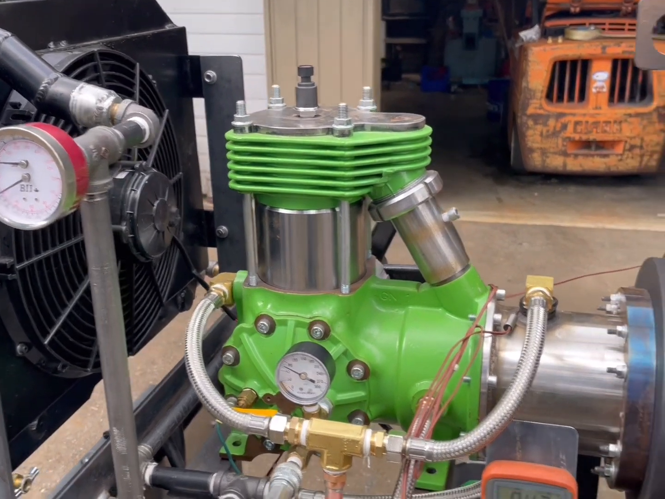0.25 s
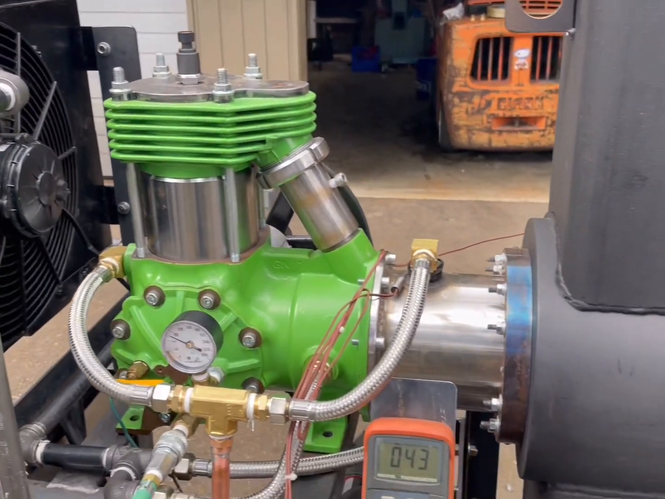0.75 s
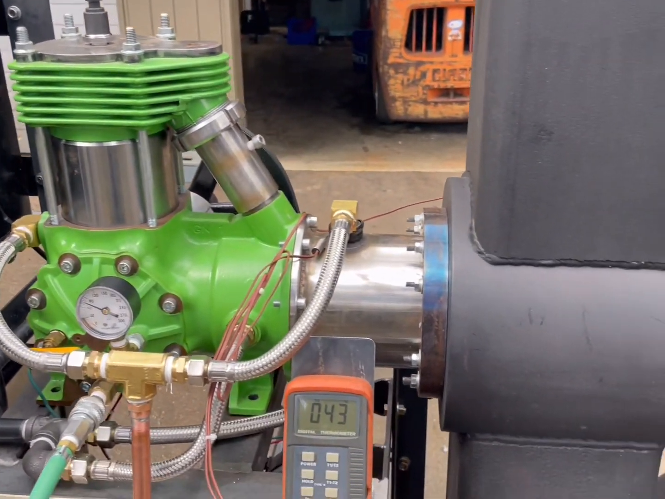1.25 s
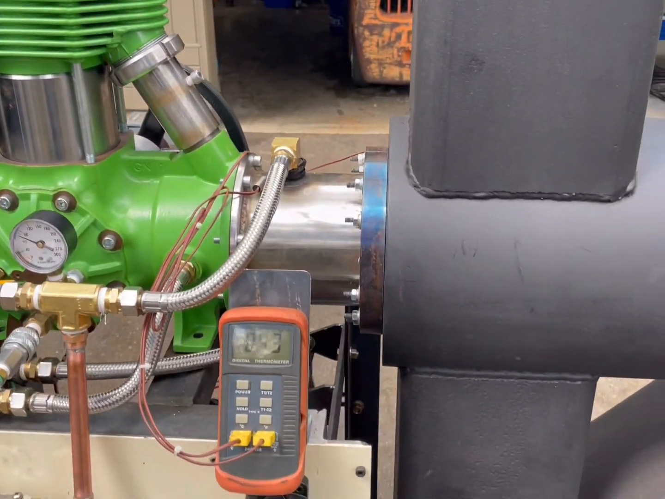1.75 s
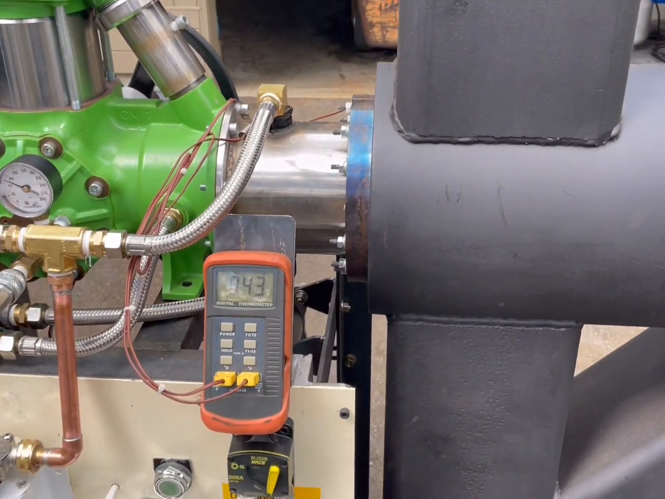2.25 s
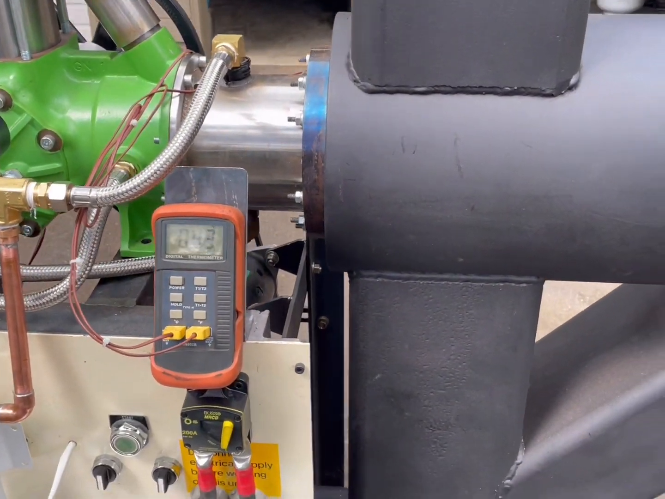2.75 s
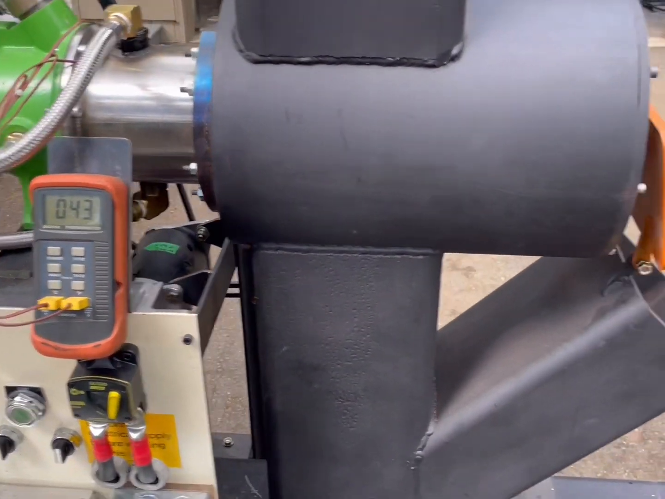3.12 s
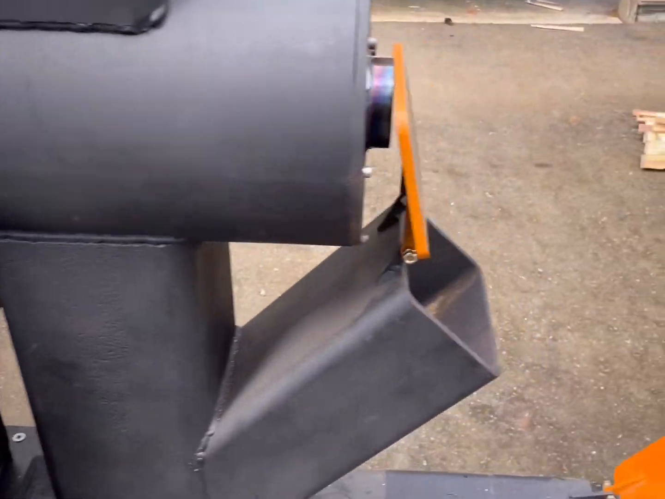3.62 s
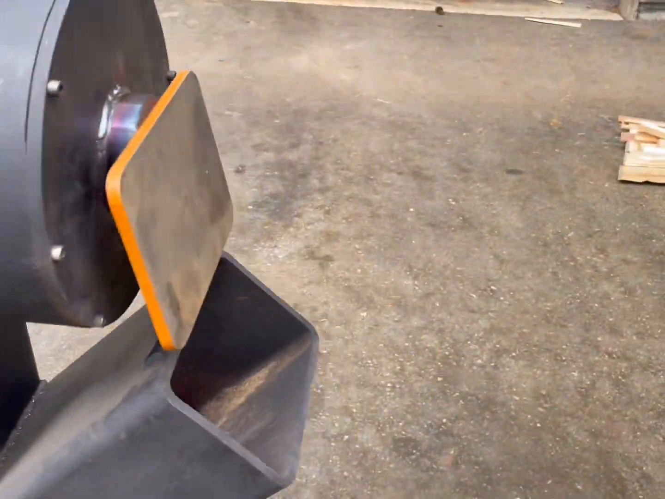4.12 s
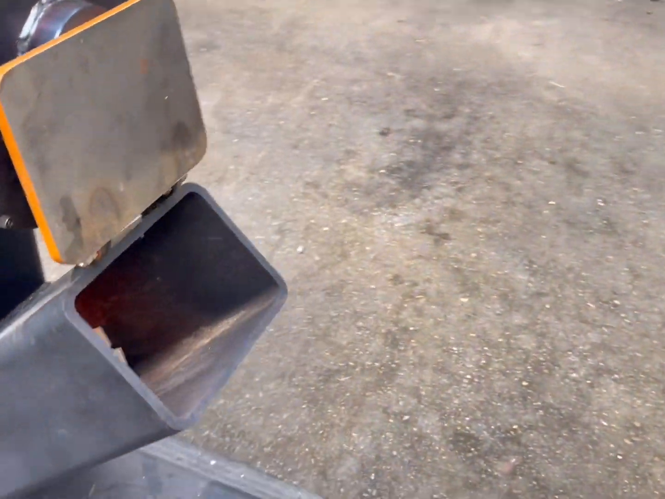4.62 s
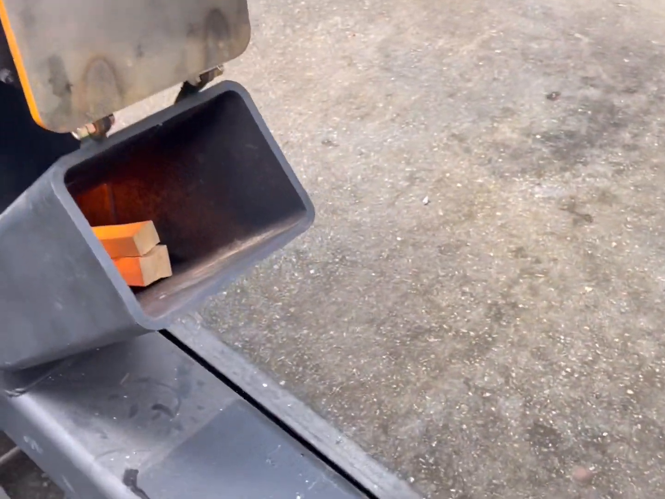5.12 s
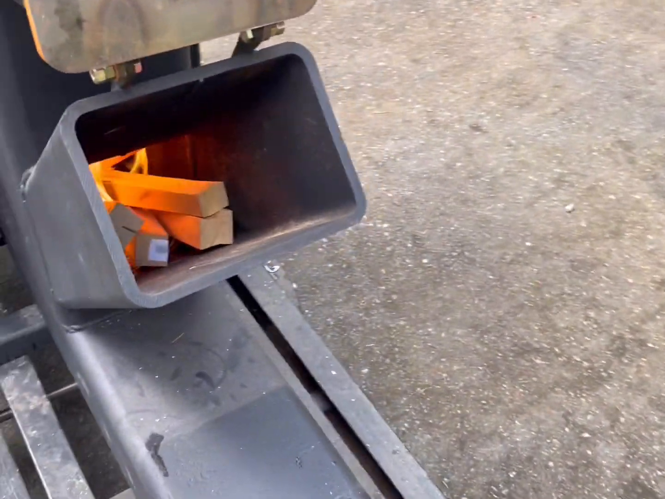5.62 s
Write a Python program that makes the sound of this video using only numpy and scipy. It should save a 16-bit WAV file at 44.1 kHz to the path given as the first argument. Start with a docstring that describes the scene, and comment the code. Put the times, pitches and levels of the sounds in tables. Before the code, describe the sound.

A wood-burning stove sounds in an open workshop doorway, heard by a moving hand-held phone in stereo. From the start a low flue boom, around 120 hertz, and deeper rumble waver constantly, swelling by chance. A small pop at 0.2 s precedes a bright, ringing crack at 0.45 s, echoed by a wall across the yard. A soft flare hisses around 1.1 s with a dull thud; low gusts follow near 1.5 and 1.9 s. Faint bird chips come from 2.4 s, clearest at 3.05 s. A hard, woody crack lands at 2.93 s. From about 3 s flame hiss, flutter and fine crackle grow as the chute opens toward the phone. Muffled pops cluster from 3.7 s; thuds sink at 4.35 and 4.6 s, with a tiny hand tick at 4.32 s. Hollow knocks follow around 5 s, then the sharpest metallic snap at 5.4 s and faint pops to the end.

```python
"""A wood stove that heats a small hot-air engine burns in the open door of a workshop, across the yard from a
wall. Noise shaped by air resonances booms steadily in the flue, swelling as the fire puffs, with low gusts and
dull, sinking thuds. Splitting sticks pop as dying noise bursts that ring the modes of the steel feed chute and
reflect around it. A hand-held phone moves from the engine round to the open chute, where flames hiss; the hand
ticks on it once. A small bird, a buzzing frequency-modulated tone, chips far off over the hush of the yard."""
import sys
import numpy as np
from scipy import signal
from scipy.fft import rfft, irfft, next_fast_len
from scipy.io import wavfile
from scipy.ndimage import uniform_filter1d

SR = 44100
rng = np.random.default_rng(int(sys.argv[2]) if len(sys.argv) > 2 else 0)


def bounce(signal):
    """Save signal as a 16-bit WAV file at the path given by the first command-line argument."""
    frames = np.transpose(np.atleast_2d(signal))
    limited = np.clip(frames, -1, 1)
    pcm = np.round(limited * 32767).astype(np.int16)
    wavfile.write(sys.argv[1], SR, pcm)


N = 258778
T = np.arange(N) / SR
HZ = np.maximum(np.arange(N // 2 + 1) * SR / N, 1)


def undb(db):
    """Amplitude ratio: 20 dB to each factor of ten."""
    return 10 ** (np.asarray(db) / 20)


def unit(x):
    """Normalisation to an rms of 1."""
    return x / np.sqrt(np.mean(x ** 2))


def curves(rows):
    """Linear interpolation in time of each column of a table."""
    s, *columns = np.transpose(rows)
    return [np.interp(T, s, column) for column in columns]


def shape(points, hz=HZ):
    """Spectral envelope: gain of an (f/Hz, level/dB) outline, straight over log frequency."""
    f, db = np.transpose(points)
    return undb(np.interp(np.log(hz), np.log(f), db))


def echo(x, response):
    """Linear system: convolution with an impulse response, keeping the length."""
    return signal.fftconvolve(np.atleast_2d(x), np.atleast_2d(response), axes=1)[:, :x.shape[-1]]


def colour(x, points, size=1024):
    """Minimum-phase filter with an (f/Hz, level/dB) outline, made causal by folding the cepstrum."""
    hz = np.maximum(np.arange(size // 2 + 1) * SR / size, 1)
    cepstrum = irfft(np.log(shape(points, hz)))
    cepstrum[1:size // 2] *= 2
    cepstrum[size // 2 + 1:] = 0
    return echo(x, irfft(np.exp(rfft(cepstrum))))


def add(out, s, x):
    """Superposition of a short sound from time s on."""
    i = int(s * SR)
    out[:, i:i + x.shape[-1]] += x[..., :N - i]


def pan(db):
    """Interchannel level difference, shared as opposite left and right gains."""
    return undb(np.array([[db], [-db]]) / 2)


def walk(rate):
    """Random modulation: levels drawn every 1 / rate s and joined by slopes, of rms 1."""
    k = int(SR / rate)
    steps = np.repeat(rng.standard_normal(N // k + 1), k)
    return unit(uniform_filter1d(steps, k)[:N])


def air(gain, apart_hz=1200, least=0.24):
    """Spatial coherence: shaped stereo noise, alike in both channels for long waves and less so for short."""
    size = next_fast_len(N, True)
    hz = np.arange(size // 2 + 1) * SR / size
    mid, side = rfft(rng.standard_normal((2, size))) * np.interp(hz, HZ, gain)
    side = side * np.clip(hz / apart_hz, least, 1)
    return unit(irfft(np.array([mid + side, mid - side]), size)[:, :N])


def even(x, size=3500):
    """Level equalisation: division by the running rms removes slow swells and keeps quick flutter."""
    return x / np.sqrt(uniform_filter1d(np.mean(x ** 2, axis=0), size) + 1e-9)


def tail(t60, db, rise_s, channels=2):
    """Diffuse reverberation: dense reflections that build up and decay exponentially, with a given energy."""
    t = T[:SR]
    x = rng.standard_normal((channels, SR)) * undb(-60 * t / t60) * (1 - np.exp(-t / rise_s))
    return unit(x) * undb(db) / np.sqrt(SR)


def swells(rows, values):
    """Raised-cosine envelopes, one for each (peak t/s, length/s, ..) row, as high as its value."""
    total = 0
    for (s, length, _), value in zip(rows, values):
        phase = np.pi * np.clip((T - s) / length, -.5, .5)
        total = total + value * np.cos(phase) ** 2
    return total


def gusts(rows):
    """Amplitude envelope of (peak t/s, length/s, peak level/dB) rows, as a gain."""
    return swells(rows, [undb(db) for _, _, db in rows])


def boom_swells():
    """Puffs of the fire: swells that raise the flue's boom in dB, shared by the flames' flutter and the higher
    resonances."""
    # puffs of the fire: peak t/s, length/s, rise/dB
    swell_rows = [(0.474, 0.15, 9.5), (1.312, 0.37, 3), (1.546, 0.067, 5.5), (2.24, 0.46, 5),
                  (2.522, 0.055, 10), (2.755, 0.12, 4.5), (3.073, 0.13, 6), (3.51, .12, 3.5),
                  (3.7, .09, 7.5), (4.263, 0.07, 8.5), (4.467, 0.16, 7.5), (4.916, 0.11, 6.5),
                  (5.277, 0.12, 4.5), (5.583, 0.075, 0.5), (5.745, 0.12, 9)]
    return swells(swell_rows, [db for _, _, db in swell_rows])


def draught(facing):
    """Turbulence excites resonators: flames rumble and keep the air of flue and firebox sounding."""
    # turbulence of the flames: f/Hz, relative level/dB per Hz
    rumble_outline = [(15, -42.5), (28, -8.5), (42, 10.5), (55, 16.5), (78, 17.5), (100, 1), (140, -19),
                      (220, -49), (1000, -89.5)]
    # the flue's lowest air resonance with its skirts: f/Hz, relative level/dB per Hz
    boom_outline = [(70, -14), (98, 1.5), (113, 5), (120, 10), (128, 6), (148, -6.5), (185, -10.5),
                    (230, -28), (400, -64), (1000, -90)]
    # low gusts over the rumble: peak t/s, length/s, peak level/dB
    gust_rows = [(1.508, 0.15, -35), (1.9, 0.75, -50), (3.602, 0.1, -38), (3.971, 0.11, -40.5)]
    # higher air resonances: f/Hz, half-width at half gain/Hz,
    # level beside the engine/dB, level at the chute/dB, both before the uneven lumps
    drones = [(288.9, 14, -60, -67), (372, 63, -89, -60), (435.8, 21, -64.5, -61), (607, 8.1, -80.5, -83),
              (659.3, 12, -93, -67.5), (840, 96, -78.5, -73)]
    # steady levels (dB) for facing 0 and 1, and rms of their random wavering (dB)
    boom_db, boom_chute_db, boom_waver_db = -46, -44, 2
    rumble_db, rumble_chute_db, rumble_waver_db = -54, -49, -1.5

    rumble_level_db = rumble_db + (rumble_chute_db - rumble_db) * facing + rumble_waver_db * walk(rate=10)
    rumble = undb(rumble_level_db) + gusts(gust_rows)
    boom_level_db = boom_db + (boom_chute_db - boom_db) * facing + boom_waver_db * walk(rate=16)
    boom = undb(boom_level_db + boom_swells())
    out = even(air(shape(rumble_outline), least=0.19)) * rumble * pan(db=0.5)
    out += even(air(shape(boom_outline), least=0.091)) * boom * pan(db=-1.5)

    # tongues of flame drive all the higher resonances in uneven lumps
    licks_db = 2.2 * walk(rate=22) + 2.8 * walk(rate=70) + .6 * boom_swells()
    for hz, width, beside_db, chute_db in drones:
        resonance = 1 / (1 + ((HZ - hz) / width) ** 2)
        level_db = beside_db + (chute_db - beside_db) * facing + licks_db
        out += air(resonance, apart_hz=1140) * undb(level_db) * pan(db=-2.0)
    return out


def flames(facing, swell_share=0.75):
    """Amplitude-modulated turbulence: flames flutter low, share the boom's swells, hiss smoothly above and flare."""
    # hiss of the flames at the chute: f/Hz, relative level/dB per Hz
    flame_outline = [(150, 2.5), (400, -9.5), (700, 2.5), (1100, 5.5), (2000, -2), (3500, -12), (5500, -21),
                     (7200, -18), (10000, -20.5), (13500, -20.5), (15500, -23)]
    # hiss of a flare: f/Hz, relative level/dB per Hz
    flare_outline = [(200, -18), (600, -4), (1200, 2), (2200, 1), (3200, -10), (6500, -17), (9000, -22.5),
                     (14000, -17.5), (16000, -29)]
    # flares: peak t/s, length/s, peak level/dB before their flutter
    flare_rows = [(1.08, 0.32, -61.5), (1.31, 0.48, -71.5), (3.27, 0.57, -67)]

    low = 1 / (1 + (HZ / 2600) ** 2)
    flutter_db = 2.0 * walk(rate=26) + 3.2 * walk(rate=110) + swell_share * boom_swells()
    flutter = air(shape(flame_outline) * low, apart_hz=1320) * undb(-65.5 + flutter_db)
    hiss = air(shape(flame_outline) * (1 - low), apart_hz=1300) * undb(-67.0 + 1.0 * walk(rate=18))
    flare = air(shape(flare_outline), apart_hz=1300) * gusts(flare_rows) * undb(1.4 * walk(rate=40))
    return (flutter + hiss) * facing * pan(db=-0.5) + flare


def yard():
    """Band-wise modulation: in a dull open-air hush each octave wavers by itself and with the others."""
    # air of the yard: f/Hz, relative level/dB per Hz
    yard_outline = [(150, 8), (250, 5), (500, -0.5), (700, -6.5), (1300, -16), (2300, -19.5), (4000, -31),
                    (7000, -41.5), (14000, -50.5), (16000, -68.5)]
    waver_db = 1.2 * walk(rate=14)
    spectrum = rfft(air(shape(yard_outline), apart_hz=1317), 2 * N)
    hz = np.maximum(np.arange(N + 1) * SR / (2 * N), 1)
    octave = np.clip(np.log2(hz / 300), 0, 4)
    out = 0
    for k in range(5):
        # overlapping triangular bands that sum to the whole
        band = irfft(spectrum * np.maximum(1 - abs(octave - k), 0))[:, :N]
        out = out + band * undb(waver_db + 1.2 * walk(rate=12) + 1.7 * walk(rate=45))
    return out * undb(-60.5) * pan(db=-1.5)


def crackle(facing, count=110):
    """Filtered impulses: tiny bursts of sap, mostly faint, grow louder as the chute turns into view."""
    clicks = np.zeros((1, N))
    when, size = rng.random((count, 2)).T
    clicks[0, (when * (N - 1)).astype(int)] = undb(-18 * np.sqrt(size))
    outline = [(200, -29.0), (900, -14.0), (2500, -4.0), (6000, -9.5), (14000, -19.0)]
    return colour(clicks * facing, outline) * undb(-28)


def flaps(facing, count=80):
    """Smeared impulses: tongues of flame flap in soft, dull, uneven knocks, strongest at the open chute."""
    knocks = np.zeros((1, N))
    when, size = rng.random((count, 2)).T
    knocks[0, (when * (N - 1)).astype(int)] = undb(-10 * size)
    soft = echo(knocks * facing ** 2, tail(t60=0.053, db=-1, rise_s=.006, channels=1))
    outline = [(80, -14.5), (250, -5.5), (420, -5.5), (850, -6), (1500, -24), (4000, -53.5)]
    return colour(soft, outline) * undb(-9)


def burst(t60, size=6000):
    """Broadband transient: a dying cluster of micro-impulses, whitened in turns, of unit energy."""
    t = T[:size]
    x = rng.standard_normal(size)
    for _ in range(3):
        spectrum = rfft(x * undb(-20 * t / t60))
        flat = irfft(spectrum / (np.abs(spectrum) + 1e-12))
        x = flat * np.clip(2 - t / t60, 0, 1) ** 2
    return x / np.sqrt(np.sum(x ** 2))


def stick(note_hz, size=1000):
    """Damped bending modes: the short ring of a small solid piece, each mode with its gain at its centre."""
    # bending modes: multiple of the note, sharpness Q, level/dB
    stick_modes = [(1, 4.7, -0.5), (2.45, 8.4, -18)]
    t, ring = T[:size], 0
    for multiple, q, db in stick_modes:
        hz = note_hz * multiple
        if hz < SR / 2:
            decay = np.pi * hz / q
            mode = np.exp(-decay * t) * np.cos(2 * np.pi * hz * t)
            ring = ring + undb(db) * 2 * decay / SR * mode  # 2 * decay / SR gives unit gain at resonance
    return ring


def pops_and_tick():
    """Impulsive excitation: bursts ring short modes, as steam splits the wood and, once, the hand ticks the phone.
    Gives the sound that comes straight out and the sound sent on to the steel and the reflections."""
    # pops of the wood; the row at 4.3213 s is a tiny, bright, dry tick of the hand on the phone:
    # t/s, level at the centre before the firebox/dB, t60 of the burst/s, centre f/Hz,
    # fall on both sides/dB per octave, note of the ring f/Hz, ring against the burst level/dB,
    # part sent on to the steel and the reflections, against the whole level/dB
    pop_rows = [(0.227, -12, 0.027, 1040, 8, 4030, -5, -1.5),
                (0.4546, 4, 0.015, 5800, 3.5, 4270, -0.5, 1.5), (.456, -0.5, 0.013, 1100, 9, 1064, 6, -7),
                (.4605, 1, 0.015, 7000, 4.5, 1940, 6.5, -1.5), (.473, -6.5, 0.13, 8940, 5.5, 1380, 4.5, -2),
                (.682, -17.5, 0.016, 1010, 9.5, 2230, -8, 4.5), (.696, -16, 0.018, 1180, 11, 1700, -6, 2),
                (.709, -18, 0.021, 1007, 11, 2580, -3.5, 0.5), (1.948, -19, 0.044, 2050, 17, 1990, 0.5, 1),
                (2.927, 10, 0.0054, 2243, 31.5, 2750, -0.5, -6), (2.9275, 1, 0.015, 595, 4, 5270, -6, 1.5),
                (2.932, 0.5, 0.033, 328, 12, 1320, -0.5, 0.5), (3.209, -14, 0.018, 1100, 11, 3700, -5, 1),
                (3.693, -11, 0.008, 714, 16, 945, -1.5, -11), (3.754, -5, 0.012, 604, 7.5, 3280, -12.5, -2),
                (3.838, -16.5, 0.013, 1480, 15, 4100, -5, 0),
                (3.85, -11.5, 0.014, 804, 11, 1200, 1.5, -1.5), (3.943, -10, 0.037, 450, 14, 700, -12, -5),
                (4.249, -18, 0.0079, 800, 14, 940, -10, 0),
                (4.3213, -18.5, 0.0037, 13100, 4.5, 1210, 3, -5), (4.437, -21, 0.014, 500, 8, 1000, -8, -6),
                (4.516, -13.5, 0.22, 1007, 6, 3470, -1.5, -4), (4.556, -13, 0.018, 890, 9, 1200, -10, -8),
                (4.569, -8.5, 0.011, 1090, 7.5, 3320, -8.5, 2.5),
                (4.6225, -32, .003, 13500, 11, 11000, -7, 13), (4.915, -1, 0.022, 380, 19, 640, -20, 4.5),
                (5.007, -1.5, 0.013, 420, 15.5, 780, -12.5, 4),
                (5.105, -8.5, 0.015, 450, 10, 780, -10, -2.5), (5.147, -19, .008, 1714, 15.5, 1650, -6, -1),
                (5.274, -4, 0.042, 380, 19, 700, -6, 3), (5.3984, 11, 0.01, 13300, 7, 13600, -1.5, -2.5),
                (5.3999, 13.5, 0.0078, 13300, 1.5, 4150, -4.5, -2.5),
                (5.402, 9.5, 0.0059, 5000, 8.5, 1542, 2.5, -3.5),
                (5.4035, 9.5, 0.012, 299, 6, 1027, -2, -7), (5.596, -12, 0.0052, 1333, 17.5, 1410, 2.5, -9),
                (5.73, -11, .04, 592, 11, 1300, -8, -4)]
    # how unlike the two channels hear a burst: f/Hz, side against mid level/dB
    apart = [(200, -17), (600, -6.5), (1400, -6.5), (4000, 2.5), (7000, -10), (14000, -7.5)]
    # colour of the firebox, laid on every row: f/Hz, level/dB
    firebox = [(40, -15), (150, 9), (300, -0.5), (700, -3.5), (1000, -3), (1800, -7), (2600, -5),
               (3900, -10), (7000, -3), (10500, -4.5), (13500, -4.5), (15500, -13)]

    straight, struck = np.zeros((2, 2, N))
    for s, db, t60, hz, fall_db, note_hz, ring_db, steel_db in pop_rows:
        outline = [(f, -fall_db * abs(np.log2(f / hz))) for f in (20, hz, SR / 2)]
        mid = burst(t60)
        side = colour(burst(t60), apart)
        impulse = mid + np.array([[1], [-1]]) * side
        ring = echo(impulse, stick(note_hz)) * undb(ring_db)
        pop = (colour(impulse, outline) + ring) * undb(db)
        add(straight, s, pop)
        add(struck, s, pop * undb(steel_db))
    return [colour(x, firebox) * pan(db=-0.1) for x in (straight, struck)]


def chute(x, facing, turned_away_db=-7):
    """Modal resonance: each crack meets quick reflections and rings modes that beam out of the mouth."""
    # modes of the steel chute and the air in it: f/Hz, t60/s, relative level/dB
    chute_modes = [(291, .28, -14), (435, .12, -9), (587, .19, -5), (654, .22, 2.5), (830, .1, -10),
                   (1002, .27, -5.5), (1125, .12, -2), (1375, .06, -5), (1406, .55, -7.5), (1567, .1, -4),
                   (1645, .18, -5.5), (2100, .07, -5), (2520, .09, -6), (2640, .09, -7), (2810, .12, -7),
                   (3080, .07, -4), (3620, .1, -7), (4165, .09, -3), (4414, .2, -13), (4754, .14, -9),
                   (5040, .12, -6), (5272, .14, -5), (5900, .08, -6), (6300, .1, -9), (6910, .09, -4)]
    t = T[:SR // 2]
    ring = 0
    for hz, t60, db in chute_modes:
        # each mode meets the two channels with its own phase, further apart for short waves
        phase = rng.standard_normal((2, 1)) * hz / 1500
        ring = ring + undb(db - 60 * t / t60) * np.cos(2 * np.pi * hz * t + phase)
    bounces = echo(x, tail(t60=.045, db=-8.5, rise_s=.002))
    walls = colour(bounces, [(200, -9.0), (700, 3.0), (5000, 3.5), (12000, -15.5)])
    return walls + echo(x, ring) * undb(-40.5 + turned_away_db * (1 - facing))


def workshop(x):
    """Room reverberation: machine and floor answer quickly; the hall behind adds a faint, longer tail."""
    near_outline = [(200, -6.5), (1200, 6), (5000, 2.5), (8000, -6.5), (13000, -4.5)]
    hall_outline = [(200, -6), (1200, 6.0), (2800, 2), (5000, 5), (8000, -1.5), (13000, -15.0)]
    near = colour(echo(x, tail(t60=0.15, db=-9.0, rise_s=0.0032)), near_outline)
    hall = colour(echo(x, tail(t60=0.86, db=-23.5, rise_s=0.0061)), hall_outline)
    return near + hall


def far_wall(x, facing, delay_s=.045):
    """Delayed reflection: a wall across the yard returns the treble late, less as the stove screens it."""
    outline = [(300, -20), (2700, -19), (4500, 2), (7000, 0.5), (11000, 1), (15000, -3.5)]
    slap = colour(echo(x, tail(t60=0.028, db=-5.5, rise_s=0.00055)), outline)
    out = np.zeros((2, N))
    add(out, delay_s, slap * (1 - facing) ** 2)
    return out


def thuds(rough=0.49):
    """Gliding tones under short envelopes: dull thuds sink in pitch and die within a few cycles."""
    # thuds: peak t/s, length/s, start f/Hz, end f/Hz, peak level before the unevenness/dB
    thud_rows = [(1.108, 0.048, 62, 49.3, -29.5), (4.349, 0.046, 80.6, 60.2, -29),
                 (4.611, .08, 90, 41.5, -28)]
    out = 0
    for s, length, start_hz, end_hz, db in thud_rows:
        hz = np.interp(T, [s - length / 2, s + length / 2], [start_hz, end_hz])
        tone = np.sin(2 * np.pi * np.cumsum(hz) / SR + 2 * np.pi * rng.random())
        out = out + tone * gusts([(s, length, db)])
    return out * (1 + rough * walk(rate=160))  # rough: rms unevenness of the amplitude


def bird(size=8000):
    """Frequency modulation: thin, buzzy chips slide onto their pitch and scatter off the yard walls."""
    # calls: t/s, length/s, start f/Hz, end f/Hz, rms buzz/Hz, peak level before the scatter/dB
    chips = [(2.384, 0.1, 4620, 4780, 130, -76.5), (2.47, 0.076, 6130, 4700, 450, -82.5),
             (2.692, 0.085, 3380, 3480, 150, -78.5), (3.048, 0.05, 8100, 7410, 380, -52.5),
             (4.922, 0.028, 7500, 7190, 250, -50)]
    out, t = np.zeros((2, N)), T[:size]
    for s, length, start_hz, end_hz, buzz_hz, db in chips:
        progress = np.clip(t / length, 0, 1)
        buzz = unit(uniform_filter1d(rng.standard_normal(size), size=30))
        hz = end_hz + (start_hz - end_hz) * (1 - progress) ** 2 + buzz_hz * buzz
        envelope = np.sin(np.pi * progress ** 1.3)
        add(out, s, envelope * np.sin(2 * np.pi * np.cumsum(hz) / SR) * undb(db))
    return out + echo(out, tail(t60=.4, db=-2, rise_s=.005))


def stereo_image(x):
    """Mid-side balance and phase: the image narrows in the treble, and the left channel lags in phase."""
    # treble of the stereo image: f/Hz, phase lag of the left channel/rad, gain of the side level/dB
    image_rows = [(4000, 0, 0), (6000, 1.4, -2), (8800, 3.14, -13), (11500, 5, -10), (13500, 6.28, -22)]
    f, lag, side_db = np.transpose(image_rows)
    left, right = rfft(x, 2 * N)
    hz = np.arange(N + 1) * SR / (2 * N)
    mid = (left + right) / 2
    side = (left - right) / 2 * undb(np.interp(hz, f, side_db))
    turn = np.exp(-1j * np.interp(hz, f, lag))
    return irfft(np.array([(mid + side) * turn, mid - side]))[:, :N]


def scene():
    """Superposition of stove, reflections, hand tick, bird and the open air of the yard."""
    # walk round the stove: t/s, how far the chute faces the phone (0-1)
    facing_rows = [(0, 0.18), (2.75, 0.18), (3.15, 0.66), (3.55, 0.53), (3.8, 0.81), (4.5, 0.9), (4.8, 0.7),
                   (5.87, 1)]
    facing, = curves(facing_rows)
    straight, struck = pops_and_tick()
    small = crackle(facing) + flaps(facing)
    reflected = chute(struck + small, facing) + workshop(struck + small) + far_wall(struck, facing)
    cracks = straight + small + reflected
    return draught(facing) + flames(facing) + yard() + cracks + thuds() + bird()


def record(dry, top_hz=15900):
    """Band limiting: the stereo image narrows in the treble and a steep low-pass cuts the top."""
    low_pass = signal.ellip(8, .2, 70, top_hz, fs=SR, output="sos")
    return signal.sosfilt(low_pass, stereo_image(dry))


dry = scene()
out = record(dry)
bounce(out)
```